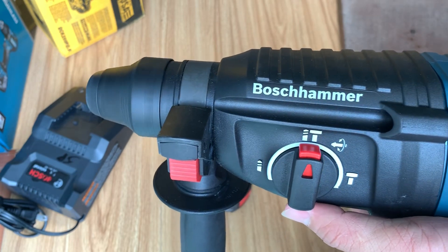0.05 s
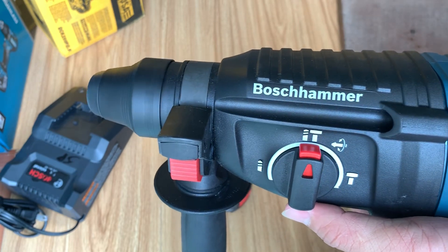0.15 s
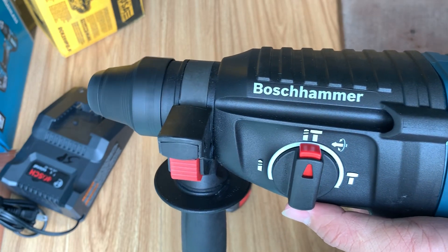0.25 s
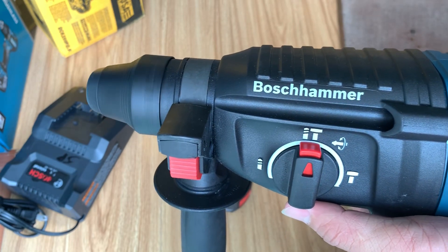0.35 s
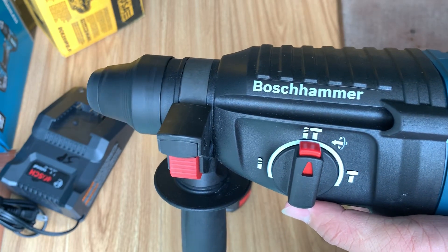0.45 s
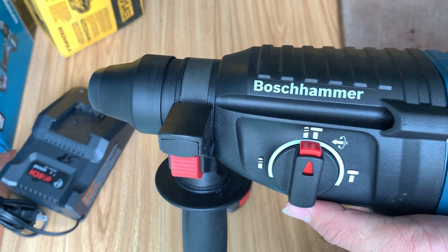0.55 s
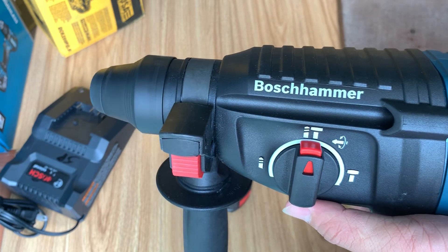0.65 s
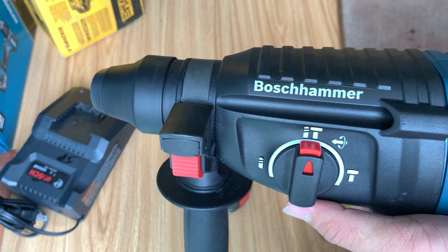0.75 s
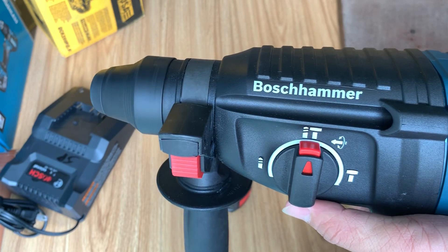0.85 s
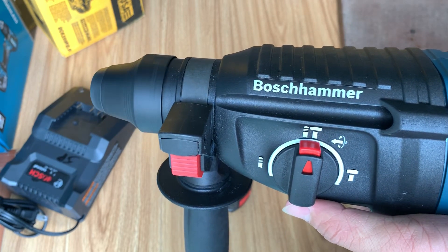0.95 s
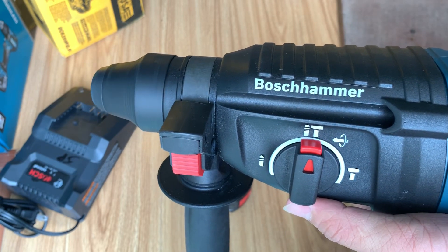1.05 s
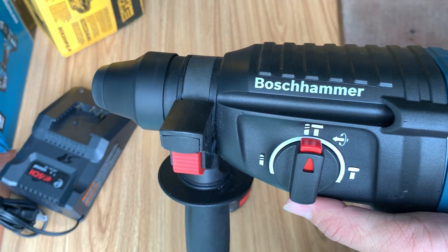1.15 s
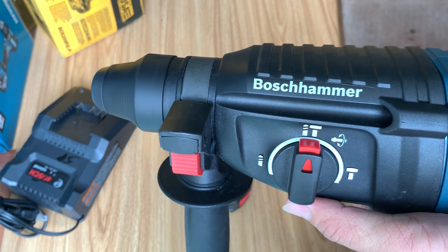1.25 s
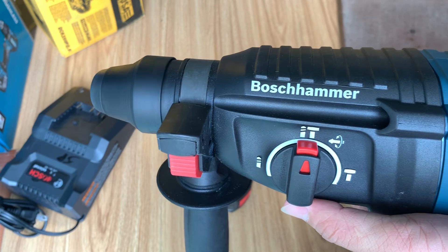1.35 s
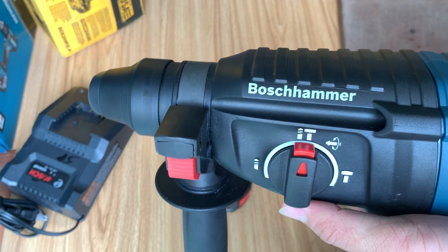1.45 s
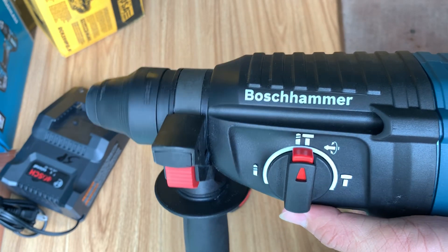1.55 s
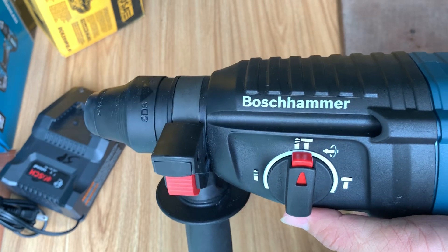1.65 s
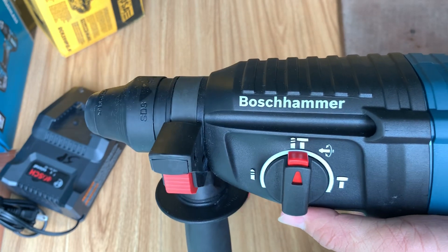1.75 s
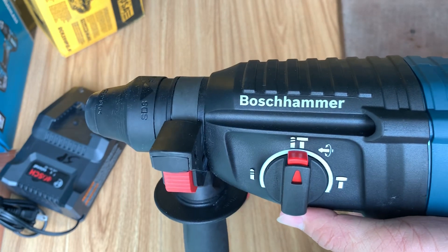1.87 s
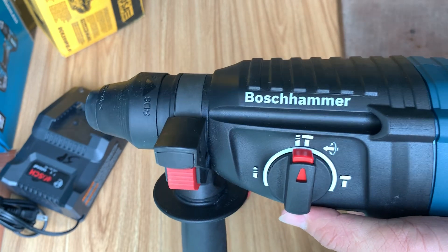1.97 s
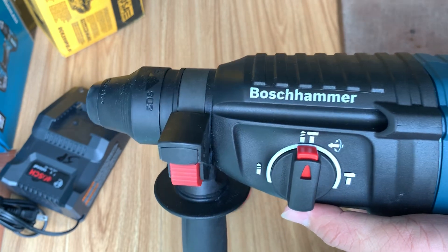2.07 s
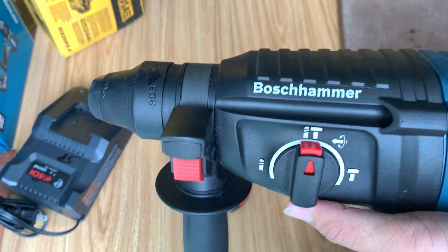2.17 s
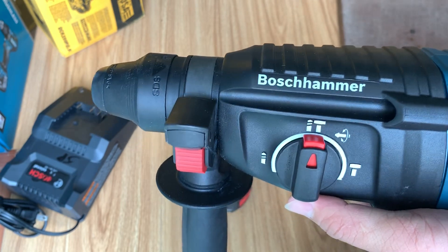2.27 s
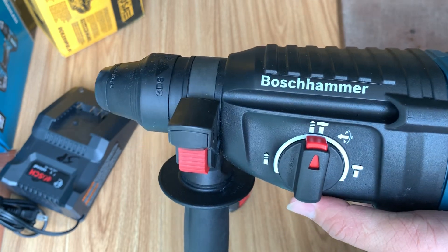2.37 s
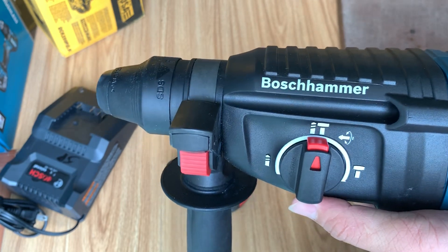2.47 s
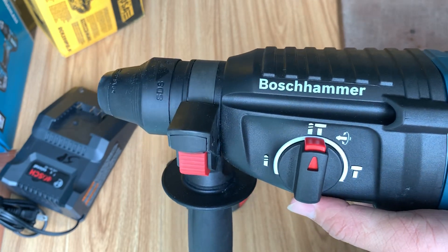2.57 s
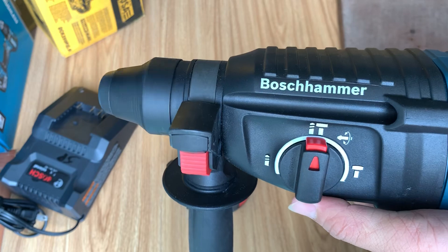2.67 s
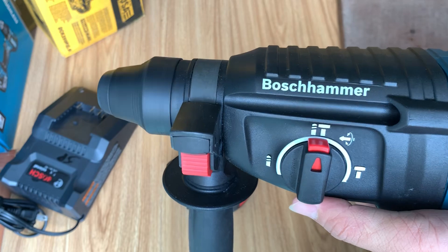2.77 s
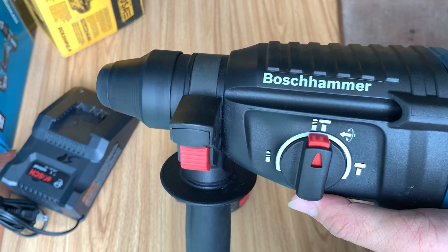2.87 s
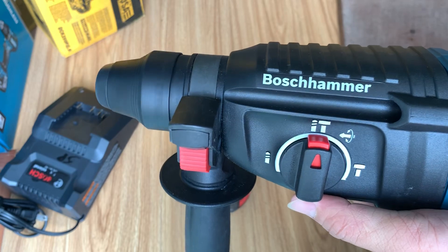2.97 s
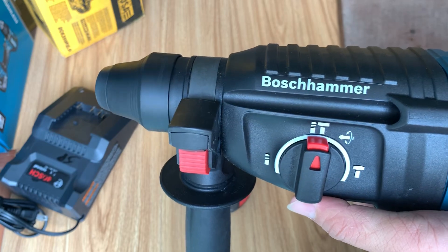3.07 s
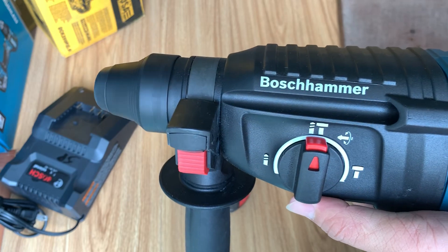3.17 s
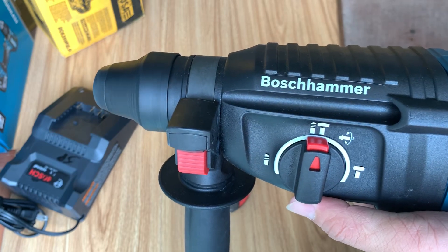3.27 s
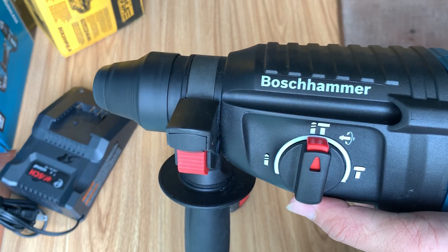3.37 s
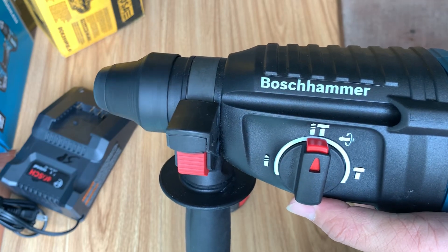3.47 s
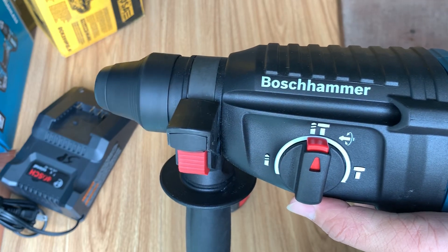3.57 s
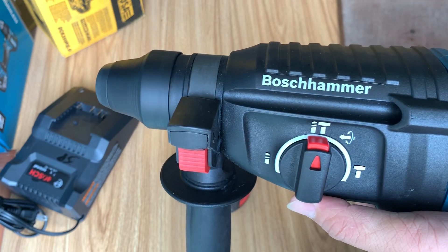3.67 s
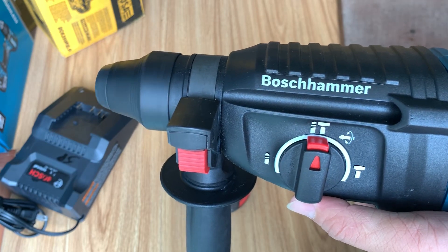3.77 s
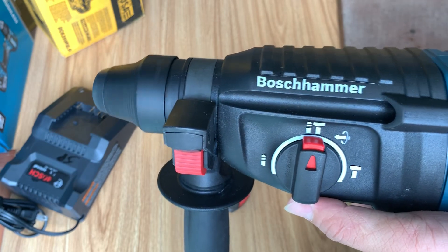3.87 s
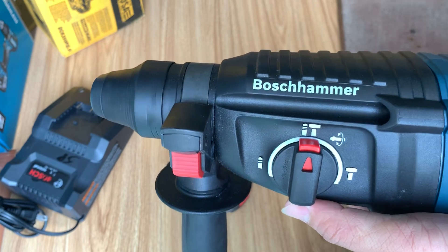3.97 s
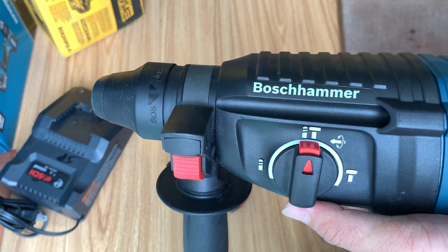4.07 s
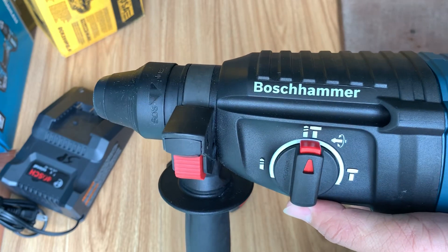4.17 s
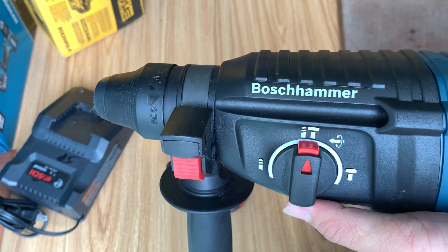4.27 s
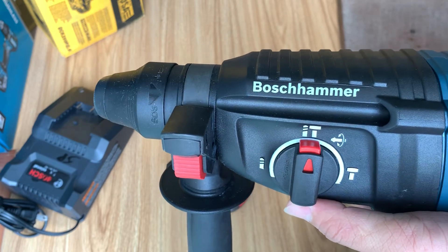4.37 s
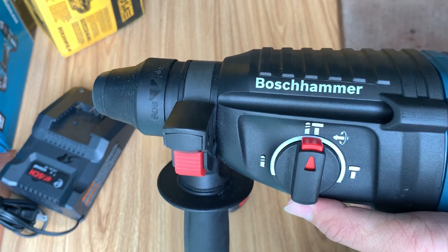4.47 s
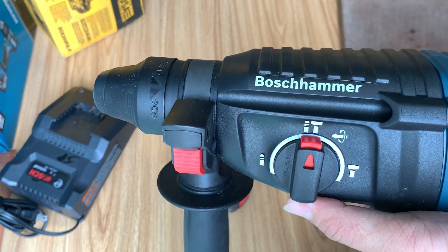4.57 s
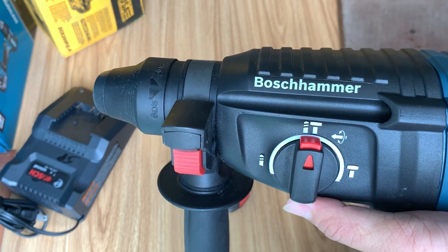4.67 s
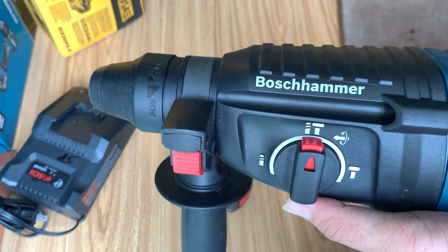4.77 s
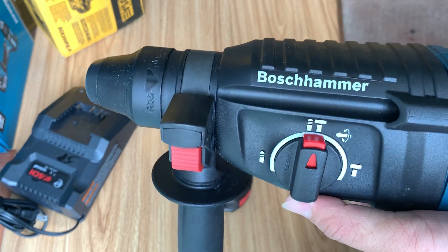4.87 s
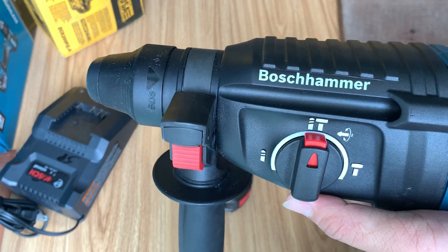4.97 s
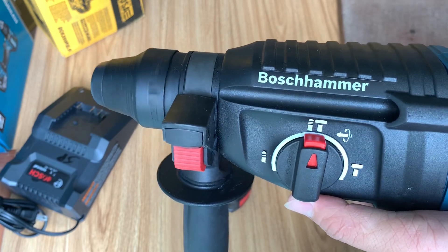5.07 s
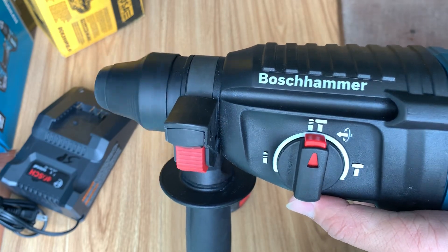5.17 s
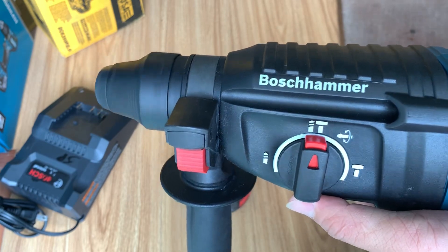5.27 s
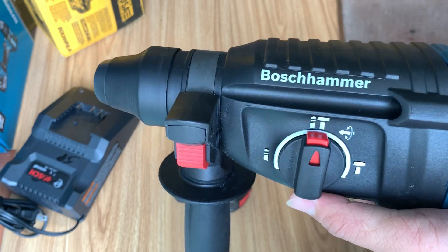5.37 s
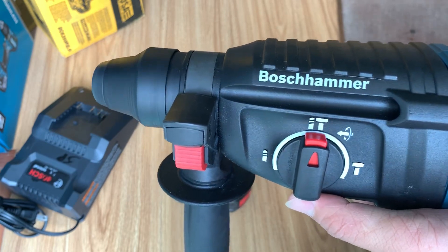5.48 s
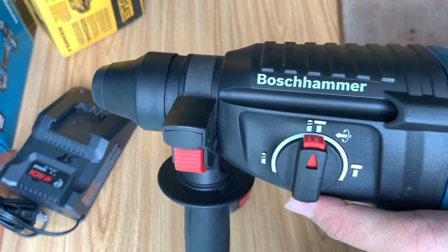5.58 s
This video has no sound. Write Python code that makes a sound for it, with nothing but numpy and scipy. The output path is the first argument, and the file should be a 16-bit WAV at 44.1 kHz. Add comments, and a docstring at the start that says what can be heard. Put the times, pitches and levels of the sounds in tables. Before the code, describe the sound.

Close stereo pickup of an unloaded hammer drill indoors: a steady clattering buzz stops after about a second and a half, with gears clicking as they settle. Switch and trigger clicks precede a shorter, harsher reversed pull, spinning up with a thin high motor tone. Another quiet gap holds faint room rumble and a distant engine hum, before clicks and a final forward burst cut off while running.

```python
"""A small room: a cordless rotary hammer runs with no bit, close to the microphone, in three pulls, the second reversed.
The first pull is already running and the third is still held at the end.
The idle mechanism knocks in the casing each stroke (impulses into resonances) over the noisy whir of gears and fan.
Gear tones zip up and down at starts and stops; a drive tone sings as the motor spins up.
Trigger, switch and backlash click between pulls; room rumble, faint whistles and a far engine's hum lie underneath."""
import sys
import numpy as np
from scipy import signal
from scipy.fft import rfft, irfft, next_fast_len
from scipy.io import wavfile
from scipy.ndimage import uniform_filter1d

SR = 44100
rng = np.random.default_rng(int(sys.argv[2]) if len(sys.argv) > 2 else 0)


def file_out(sig):
    """Save sig as 16-bit WAV at sys.argv[1]."""
    # one column per channel
    cols = np.atleast_2d(sig).T
    # limit, then scale
    lim = np.clip(cols, -1, 1)
    pcm = np.round(lim * 32767).astype(np.int16)
    wavfile.write(sys.argv[1], SR, pcm)


N = 248095
TIME = np.arange(N) / SR
SIZE = next_fast_len(N + SR)
HZ = np.maximum(np.arange(SIZE // 2 + 1) * SR / SIZE, 1)
SIDES = np.array([[1], [-1]])  # left, right

# trigger pulls: start_s, release_s, main_knock_s (time of one), strokes_per_s, direction (0 forward, 1 reverse)
PULLS = [(-.5, 1.423, .5043, 72.17, 0), (2.655, 3.873, 3.2107, 72.14, 1), (5.075, 6.0, 5.6088, 72.16, 0)]
SPIN_UP_S, BRAKE_S, STOP_S = .11, .075, .41  # ramp, braking time constant, release to standstill
THROB_HZ, THROB_PEAK_S = 7, 3.305  # rate, time of one crest


def from_db(db):
    """Amplitude ratio."""
    return 10 ** (np.asarray(db) / 20)


def rms_one(x):
    """Scale to rms 1."""
    return x / np.sqrt(np.mean(x ** 2) + 1e-20)


def at_hz(points):
    """A table over log frequency at every bin."""
    hz, value = np.transpose(points)
    return np.interp(np.log(HZ), np.log(hz), value)


def filtered(x, response):
    """Apply a frequency response."""
    return irfft(rfft(x, SIZE) * response, SIZE)[..., :N]


def resonance(x, hz, width_hz):
    """One two-pole mode, gain 1 at its centre."""
    r = np.exp(-np.pi * width_hz / SR)
    poles = [1, -2 * r * np.cos(2 * np.pi * hz / SR), r * r]
    return (1 - r * r) / 2 * signal.lfilter([1, 0, -1], poles, x + 1e-18 * TIME)


def drift(rate_hz):
    """Smooth random curve, rms 1, computed at every 32nd sample."""
    size = N // 32 + 2
    lowpass = 1 / (1 + (np.fft.rfftfreq(size, 32 / SR) / rate_hz) ** 4)
    slow = irfft(rfft(rng.standard_normal(size)) * lowpass, size)
    return np.interp(np.arange(N) / 32, np.arange(size), rms_one(slow))


def noise(spectrum):
    """Coloured stereo noise, partly alike at the two ports; rms 1."""
    # left-right likeness: hz, likeness (0-1)
    likeness = [(50, 0.2), (1200, 0.31), (2800, 0.44), (5000, 0.91), (9000, 0.85), (15000, 1)]
    alike = at_hz(likeness)
    mid, side = rfft(rng.standard_normal((2, SIZE)))
    both = np.sqrt(1 + alike) * mid + np.sqrt(1 - alike) * side * SIDES
    return rms_one(irfft(both * from_db(at_hz(spectrum)), SIZE)[:, :N])


def hammer():
    """Knocks, rattle, whir, whine and gears all follow the motor speed."""
    # base levels of each pull once settled: knock_db, whir_db
    pull_levels = [(-25.5, -29), (-26, -28.5), (-24.5, -27.5)]
    out = np.zeros((2, N))
    whirs = whir()
    for (start, release, knock_at, rate, direction), levels in zip(PULLS, pull_levels):
        knock_db, whir_db = loudness(start, direction, *levels)
        speed, turns = motion(start, release, knock_at, rate, wobble_turns=.0036)
        knock_gain = speed ** np.where(TIME < release, 4.5, 1.95)
        whir_gain = speed ** np.where(TIME < release, 1.5, 1.8)

        knocks, rattles = strokes(turns, rate, direction)
        clacks = backlash(release)
        knocks = knocks * knock_gain + clacks
        rattles = rattles * whir_gain + clacks
        out += casing(knocks * from_db(knock_db + 22.5), direction)
        out += steel(rattles * from_db(whir_db + 32.5), direction)

        chatter = rattle_envelope(rattles, decay_ms=2.0)
        hiss = np.hypot(from_db(9.0) * chatter, from_db(1.0) * whir_gain)
        out += whirs[direction] * from_db(whir_db) * hiss
        out += whine(turns, direction, waver_turns=.004) * from_db(knock_db) * knock_gain
        out += gears(speed, turns, release, direction)
        out += growl(speed, direction)
    return out


def loudness(start, direction, knock_db, whir_db):
    """Knock and whir levels of one pull: louder at first, then settling, with a throb, deeper in reverse."""
    settle_s, throb_depth_db = .86, (.2, .9)
    fresh = np.exp(-np.maximum(TIME - start, 0) / settle_s)
    throb_db = throb_depth_db[direction] * np.cos(2 * np.pi * THROB_HZ * (TIME - THROB_PEAK_S))
    return knock_db + 4 * fresh + throb_db, whir_db + 3 * fresh + throb_db


def motion(start, release, knock_at, rate, wobble_turns):
    """Share of full speed and strokes turned: a soft start, then the motor brake."""
    braking = np.maximum(TIME - release, 0)
    ramp = np.clip((TIME - start) / SPIN_UP_S, 0, 1)
    speed = ramp * np.exp(-braking / BRAKE_S) * (braking < STOP_S)
    turns = np.cumsum(speed) * rate / SR
    return speed, turns - turns[round(knock_at * SR)] + wobble_turns * drift(13)


def strokes(turns, rate, direction):
    """Every contact comes once a turn, never quite alike: impulses for the knock and for the rattle."""
    # contacts in one full-speed stroke, forward then reverse: after_knock_ms, knock_db, rattle_db
    contacts = [
        [(0, 0, -1), (1.36, -8.7, -4), (3.1, -40, -8.5), (9.8, -10.2, -13), (11.62, -14.9, -22)],
        [(0, 0, -1), (1.69, -11.5, -5), (9.78, -14.5, -15), (11.91, -14.9, -7)],
    ]
    # stroke-to-stroke scatter, forward then reverse: timing_ms, knock_db, rattle_db
    unevenness = [(.014, .5, 1.1), (.028, .9, 1.6)]
    jitter_ms, knock_spread_db, rattle_spread_db = unevenness[direction]
    knocks, rattles = np.zeros((2, N))
    forward_turns = np.maximum.accumulate(turns)
    numbers = np.arange(np.floor(turns[0]), turns[-1])
    for ms, knock_db, rattle_db in contacts[direction]:
        chance = rng.standard_normal((len(numbers), 3))
        due = numbers + (ms + jitter_ms * chance[:, 0]) * rate / 1000
        at = np.searchsorted(forward_turns, due)
        inside = (at > 0) & (at < N)
        knocks[at[inside]] += from_db(knock_db + knock_spread_db * chance[inside, 1])
        rattles[at[inside]] += from_db(rattle_db + rattle_spread_db * chance[inside, 2])
    return knocks, rattles


def backlash(release):
    """Impulses as the gears clack across their backlash after one trigger release."""
    # clacks: time_s, level_db (re a full knock)
    clacks = [(1.513, -15), (1.524, -23), (1.541, -13.5), (1.552, -23), (3.939, -17), (3.956, -24),
              (3.975, -12.5), (4.0098, -16), (4.019, -22)]
    out = np.zeros(N)
    for s, level_db in clacks:
        if release < s < release + STOP_S:
            out[round(s * SR)] = from_db(level_db)
    return out


def casing(knocks, direction):
    """A tick and a crack, then modes ring, swaying in strength; direction decides how hard each is struck."""
    # short, wide crack of the struck spot, forward then reverse: centre_hz, width_hz, level_db
    crack = [(2170, 2035, 6.5), (1620, 1815, 17.7)]
    # tick of the steel contact: centre_hz, width_hz, level_db
    tick = (5900, 2000, -8.5)
    # casing modes: centre_hz, width_hz, forward_db, reverse_db, left_minus_right_db
    modes = [(310, 68, 3, 16, -3), (353.8, 51.3, 17, 14.5, 3.5), (403, 71, 13, -5, 2.5),
             (586.3, 21, 20, 21.5, -7), (613.3, 55.2, 18, 23, -2), (778.6, 80.5, 17.5, 17, -6.5),
             (1018, 42, 6.5, 13.5, 4), (1278, 220, 13, 17.5, 0), (1143, 47, 17, 12.5, 6.5),
             (1511, 112, 16, 26, 5), (1520.6, 57, -2, 24, 5), (1704, 190, 16, 17, -3.5),
             (2080, 58, -6, 12.5, 10), (2314, 143, 20.5, 19.5, 0), (2360, 380, 3, -11, 10.5),
             (2800, 310, 20, 17, 1.5), (2883, 580, 16, 17, -0.5), (3410, 42, 11, 13, 0)]
    # casing antiresonances: centre_hz, width_hz, forward_depth (0-1), reverse_depth (0-1)
    dips = [(476, 39, 1, 0.5), (750, 45, 0.11, 0.6), (1266, 50, .5, 0.5), (1646, 72, 0.6, .05)]
    sway_db, sway_hz = 1, 12

    hz, width, crack_db = crack[direction]
    out = resonance(resonance(knocks, hz, width), hz, width) * from_db(crack_db)
    hz, width, tick_db = tick
    out = out + resonance(knocks, hz, width) * from_db(tick_db)
    for k, (hz, width, *level_db, pan_db) in enumerate(modes):
        struck = knocks * from_db(sway_db * drift(sway_hz))
        gain = (-1) ** k * from_db(level_db[direction] + SIDES * pan_db / 2)
        out = out + resonance(struck, hz, width) * gain
    for hz, width, *depth in dips:
        out = out - depth[direction] * resonance(out, hz, width)
    return out


def steel(rattles, direction):
    """Each rattle strikes each steel mode with its own strength and sign, a little unlike at the two ports."""
    # ringing steel parts: centre_hz, width_hz, forward_db, reverse_db
    modes = [(2930, 200, 7.5, -7), (3730, 120, 1, -8), (4372, 130, 6.5, 3.5), (5050, 160, -8, 5),
             (5950, 130, -2.5, 0), (6720, 45, 6.5, -9.5)]
    out = 0
    for hz, width, *level_db in modes:
        shared = rng.choice([-1, 1], N) * rng.uniform(.7, 1.05, N)
        strength = shared + rng.uniform(-.7, .7, (2, N))
        out = out + resonance(rattles * strength, hz, width) * from_db(level_db[direction])
    return out


def rattle_envelope(rattles, decay_ms):
    """Loose parts chatter for a moment around each contact: smoothed, decaying energy."""
    r = np.exp(-2000 / (decay_ms * SR))
    energy = signal.lfilter([1], [1, -r], rattles ** 2 + 1e-18)
    return np.sqrt(np.abs(uniform_filter1d(energy, size=36)))


def whir():
    """Steady gear and fan noise, forward and reverse, before speed and rattle shape it."""
    # spectra, forward then reverse: hz, density_db (per Hz, relative)
    colours = [
        [(60, -21.5), (220, -21.5), (450, -12.5), (760, 0.5), (1000, -5.5), (1450, 3.5), (2500, -2.5),
         (2950, -3), (3550, -7), (4400, -2), (5600, -3.5), (7500, -9.5), (9000, -6.5), (15500, -19)],
        [(60, -25.5), (220, -22.5), (450, -8.5), (760, 5), (1000, -1), (1450, 6), (2500, 2), (3050, 5.5),
         (3550, -6.5), (4400, 0.5), (5600, 3), (7500, -5), (9000, -4.5), (15500, -14)],
    ]
    # stereo balance: hz, left_minus_right_db
    balance = [(200, 6.5), (700, -6.5), (1500, 1.5), (4200, 0), (5500, -5), (8000, 0)]
    pan = from_db(SIDES * at_hz(balance) / 2)
    return [filtered(noise(colour), pan) for colour in colours]


def whine(turns, direction, waver_turns):
    """Body shake and gear whine: tones locked to the shaft, wavering more the higher they lie."""
    # tones: multiple_of_stroke_rate, forward_db, reverse_db, left_minus_right_db
    orders = [(0.96, -39, -31, 2.5), (2, -37, -27, -3), (3, -65, -33.5, -4), (6.02, -26, -38.5, -1.5),
              (20.66, -28, -35, 1.5), (24.75, -31.5, -32.5, 2), (37.9, -32, -29, 0),
              (44.9, -29, -26.5, -20), (45.5, -35, -23, -1), (57.4, -34.5, -24, 16)]
    angle = 2 * np.pi * (turns + waver_turns * drift(40))
    out = 0
    for order, *level_db, pan_db in orders:
        gain = from_db(level_db[direction] + SIDES * pan_db / 2)
        out = out + np.sqrt(2) * np.sin(order * angle) * gain
    return out


def gears(speed, turns, release, direction):
    """A rough, gritty zip of meshing teeth while the motor speeds up or brakes; at full speed the load is off."""
    # meshing tones: teeth_per_stroke, level_db
    meshing = [(38.9, -3.5), (25.66, -6.5)]
    zip_db = [(-27, -35), (-26, -31)][direction]  # (spinning up, braking), forward then reverse
    rough, rough_hz, grit_db = .75, 160, -3
    load = speed ** 1.25 * (1 - speed ** 6)
    gearbox = signal.butter(4, (620, 2400), "band", fs=SR, output="sos")  # radiated band, Hz
    mesh = 0
    for teeth, level_db in meshing:
        strength = from_db(level_db) * (1 + rough * drift(rough_hz))
        mesh = mesh + strength * np.sin(2 * np.pi * teeth * turns + rough * drift(rough_hz))
    grains = rng.standard_normal(N) * np.exp(drift(rough_hz) / 2)
    grit = rms_one(signal.sosfilt(gearbox, grains))
    teeth_sound = signal.sosfilt(gearbox, mesh) + from_db(grit_db) * grit
    return teeth_sound * load * np.where(TIME < release, *from_db(zip_db))


def growl(speed, direction):
    """Narrow gearbox noise that swells at random and, in reverse, with the throb."""
    hz, width_hz, level_db, swell_db = 1317.5, 169.5, (-40.5, -36.5), 4.5
    band = rms_one(resonance(resonance(rng.standard_normal(N), hz, width_hz), hz, width_hz))
    throb = np.cos(2 * np.pi * THROB_HZ * (TIME - THROB_PEAK_S)) * direction
    swell = throb + drift(THROB_HZ) / (1 + direction)
    return band * speed ** 2 * from_db(level_db[direction] + swell_db * swell)


def drive():
    """Motor drive: a thin, rough tone swells through spin-up, flares, bends upward and fades at full speed."""
    drive_hz, bend_hz, level_db, growth_db = 3215, 80, -29.5, 19
    lead_s, hold_s, fade_db_per_s = .029, .115, 301.5
    flare_after_s, flare_width_s, flare_db = .111, .015, (-32, -26.5)  # flare level: forward, reverse
    out = 0
    for start, *_, direction in PULLS:
        age = TIME - start
        rising_db = growth_db * (np.minimum(age / SPIN_UP_S, 1) - 1)
        fading_db = fade_db_per_s * np.maximum(age - hold_s, 0)
        tone = (age > -lead_s) * from_db(level_db + rising_db - fading_db)
        flare = (age - flare_after_s) / flare_width_s
        level = tone + from_db(flare_db[direction]) * np.exp(-flare ** 2)
        hz = drive_hz + bend_hz * (1 + np.tanh(flare)) / 2
        phase = 2 * np.pi * np.cumsum(hz) / SR + .9 * drift(130)
        out = out + level * np.sqrt(2) * np.sin(phase)
    return out


def clicks(gain_db, attack_ms):
    """Trigger, switch, grip and chuck clicks, and a few gear bursts as the motor spins up: short, dense noise
    bursts, each with its own brightness."""
    # clicks: time_s, level_db (before gain_db), tilt_db_per_octave, t60_s
    events = [(1.591, -43, -4.5, 0.025), (1.68, -54, 3, .02), (1.884, -60, -8, 0.052),
              (1.933, -21, 1, 0.0093), (1.937, -42, -3.5, 0.019), (2.215, -61, -9, 0.05),
              (2.527, -44.5, -4.5, 0.025), (2.56, -57, -5, 0.1), (2.602, -56, -8, 0.037),
              (2.62, -36.5, -9.5, 0.051), (2.625, -30, -5.5, 0.032), (2.657, -37.5, 9, 0.022),
              (2.664, -31, -3, 0.047), (2.691, -32.5, -6.5, 0.03), (2.701, -26, -5, 0.024),
              (4.24, -58, -5, 0.022), (4.314, -55, -3.5, 0.032), (4.353, -63.5, 0.5, 0.033),
              (4.636, -57, -7, 0.064), (4.995, -51.5, -5.5, 0.029), (5.034, -44.5, -8.5, 0.038),
              (5.053, -27, -5.5, 0.035), (5.055, -37, 10, 0.031), (5.128, -21, -6, 0.017),
              (5.143, -21.5, -6.5, 0.029)]
    # shared spectrum: hz, density_db (per Hz, relative)
    colour = [(150, -41.5), (600, -5), (1500, -1), (3200, 2.5), (5000, 5.5), (9000, -5), (15000, -13)]
    out, burst = np.zeros((2, N)), noise(colour)
    size = SR // 8
    age, hz = TIME[:size], np.maximum(np.fft.rfftfreq(size, 1 / SR), 300)
    attack = 1 - np.exp(-1000 * age / attack_ms)
    for s, level_db, tilt_db, t60_s in events:
        at = round(s * SR)
        tilt = from_db(tilt_db * np.log2(hz))
        grain = rms_one(irfft(rfft(burst[:, at:at + size]) * tilt, size))
        shape = from_db(-60 * age / t60_s) * attack
        out[:, at:at + size] += grain * shape * from_db(level_db + gain_db)
    return out


def room(x, wet_db):
    """A diffuse tail, thin in the bass, whose treble dies first."""
    t60_s, treble_t60_s, treble_hz = .37, .2, 6010
    white = rng.standard_normal((2, N)) * (TIME > .004)
    dull = filtered(white, 1 / (1 + 1j * HZ / treble_hz) ** 2)
    bright = from_db(-17.5) * white * from_db(-60 * TIME / treble_t60_s)
    tail = dull * from_db(-60 * TIME / t60_s) + bright
    thin = 1 / (1 + 400 / (1j * HZ))  # high-pass at 400 Hz
    return from_db(wet_db) * filtered(x, thin * rfft(rms_one(tail) / np.sqrt(N), SIZE))


def background():
    """Room rumble, the far engine and faint whistles."""
    return rumble() + engine() + whistles()


def rumble():
    """Bass-heavy room noise at a slowly changing level."""
    # spectrum: hz, density_db (per Hz, relative)
    colour = [(25, -22), (45, 0), (65, -5), (100, -14), (150, -13), (190, -18.5), (350, -20.5), (550, -33),
              (1000, -31.5), (2500, -45), (5000, -54), (9000, -68), (15000, -71)]
    # level: time_s, level_db
    level = [(0.0, -55), (0.45, -54.5), (3.76, -57), (4.15, -58), (5.62, -59)]
    return from_db(np.interp(TIME, *np.transpose(level))) * noise(colour)


def engine():
    """Wavering low harmonics of a far engine: it idles, then gathers speed, most of them fading."""
    # hum: multiple_of_speed, idle_db, gain_db_per_hz (of extra speed)
    orders = [(2, -63.5, -1), (4, -74, 1.4), (5, -57, -0.74), (6, -63.5, -1.7), (7, -67.5, -9.5)]
    idle_hz, rises_at_s, rise_hz_per_s = 21.7, 1.95, 1.8
    extra_hz = rise_hz_per_s * np.maximum(TIME - rises_at_s, 0)
    angle = 2 * np.pi * np.cumsum(idle_hz + extra_hz) / SR
    out = 0
    for order, idle_db, slope_db in orders:
        level_db = idle_db + slope_db * extra_hz + .89 * drift(1.8)
        phase = order * angle + rng.uniform(0, 2 * np.pi) + .27 * drift(4.5)
        out = out + np.sqrt(2) * from_db(level_db) * np.sin(phase)
    return out


def whistles():
    """Faint sine tones with wavering phase, each swelling and fading once."""
    # whistles: start_s, end_s, pitch_hz, level_db
    tones = [(4.322, 4.573, 903, -75.5), (4.339, 4.541, 1197, -80)]
    out = 0
    for start, end, hz, level_db in tones:
        swell = np.sin(np.pi * np.clip((TIME - start) / (end - start), 0, 1))
        phase = 2 * np.pi * hz * TIME + .3 * drift(80)
        out = out + np.sqrt(2) * from_db(level_db) * swell * np.sin(phase)
    return out


def scene():
    """Direct sound reaches the two ports with different phase; the room answers the clicks a little more."""
    # phase between the microphone ports: hz, left_lead_rad
    port_phase = [(50, 0), (340, -.5), (1200, -.4), (2930, -.6), (3530, -2), (3790, -1), (5430, -2),
                  (7670, -1.1), (8870, -3.4), (10200, -6), (11300, -8.5), (12200, -9.8), (12900, -12),
                  (14000, -13), (14800, -15.7)]
    running = hammer() + drive()
    clicking = clicks(gain_db=3.0, attack_ms=.97)
    direct = filtered(running + clicking, np.exp(.5j * SIDES * at_hz(port_phase)))
    reverb = room(running + from_db(4) * clicking, wet_db=-17.5)
    return direct + reverb + background()


def record(dry):
    """The highest peaks are clipped; the deepest bass and the top are cut steeply."""
    bass_cut_hz, cutoff_hz, peak_limit = 38, 15400, .86
    clipped = np.clip(dry, -peak_limit, peak_limit)
    high_pass = signal.butter(8, bass_cut_hz, "high", fs=SR, output="sos")
    low_pass = signal.ellip(10, .1, 90, cutoff_hz, fs=SR, output="sos")
    return signal.sosfilt(low_pass, signal.sosfilt(high_pass, clipped))


dry = scene()
out = record(dry)
file_out(out)
```